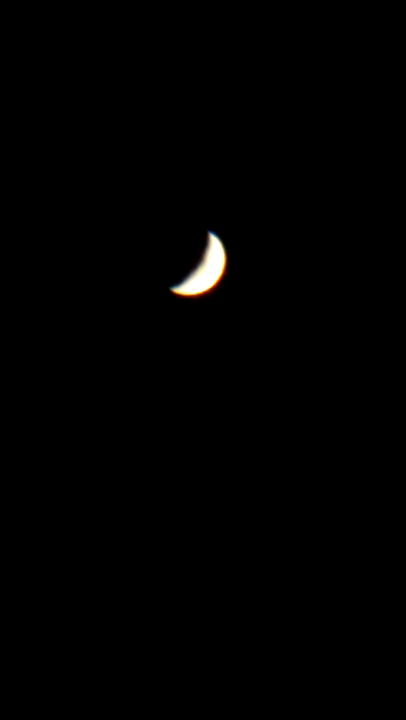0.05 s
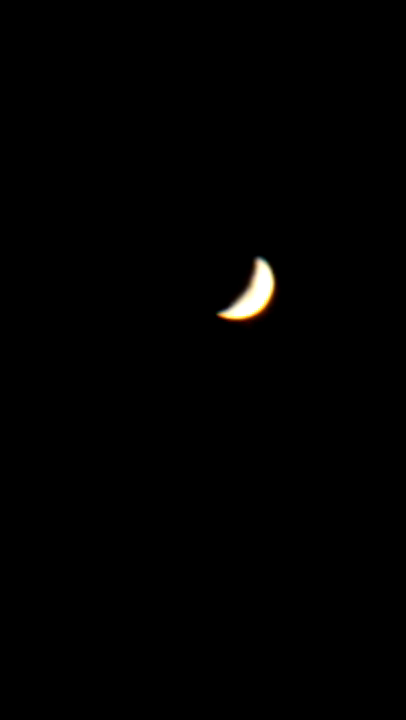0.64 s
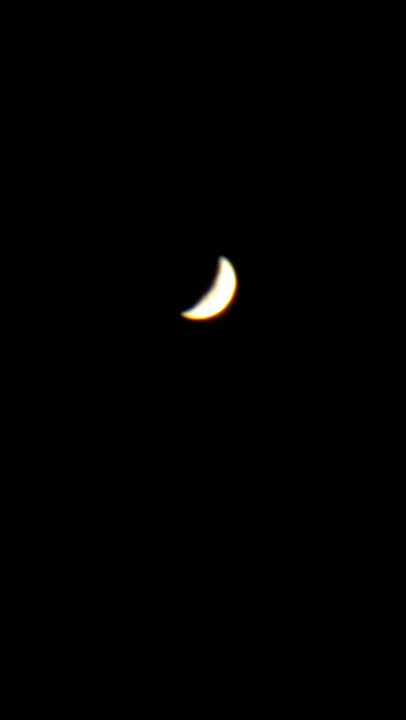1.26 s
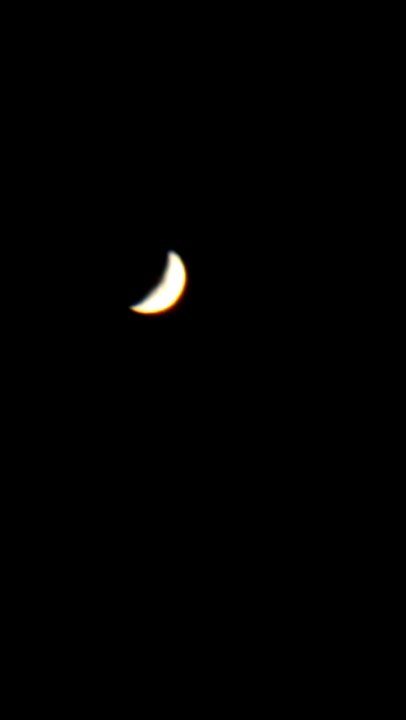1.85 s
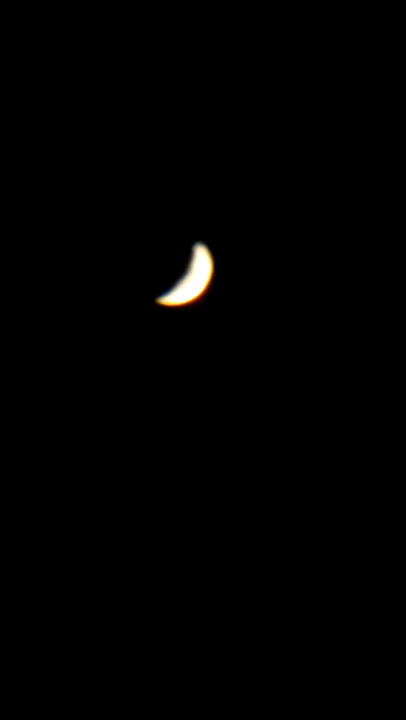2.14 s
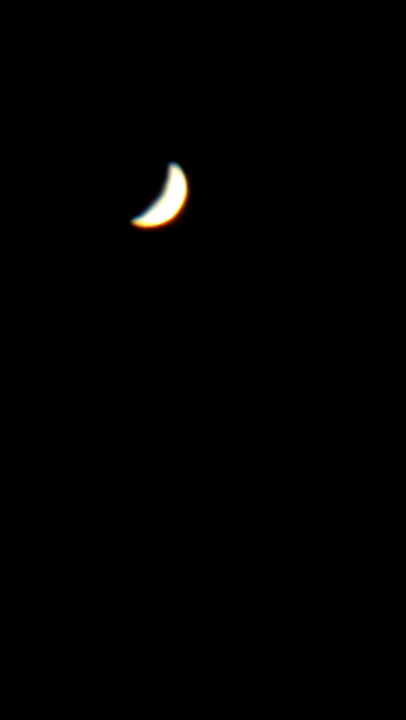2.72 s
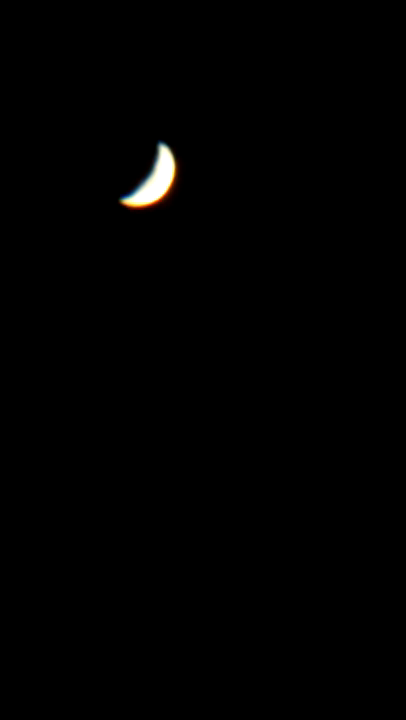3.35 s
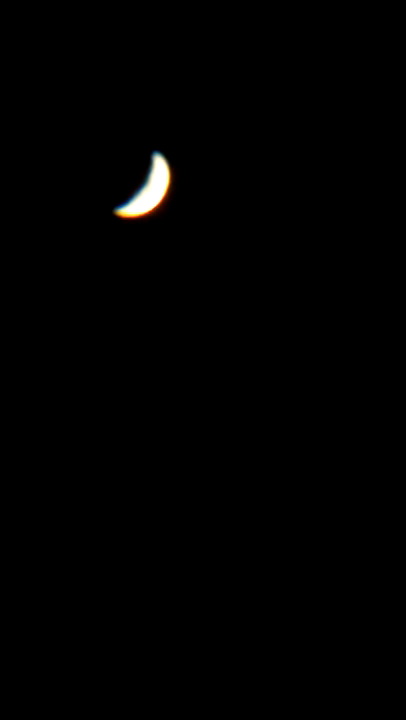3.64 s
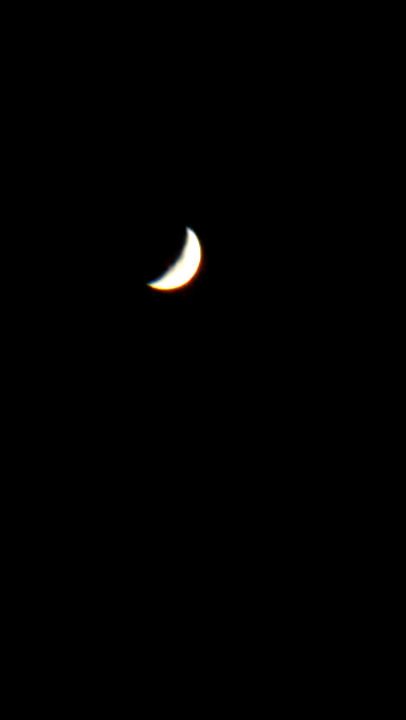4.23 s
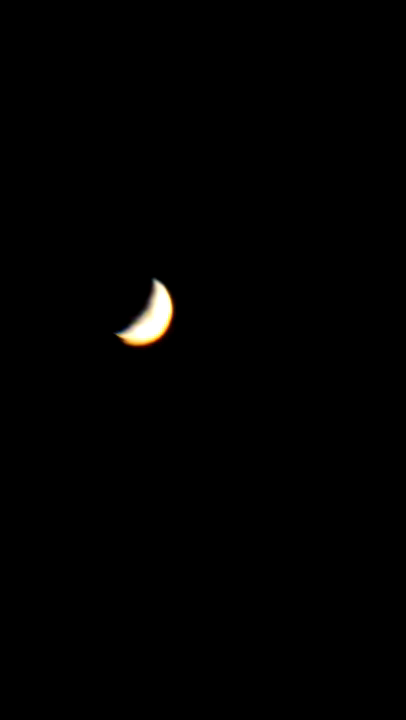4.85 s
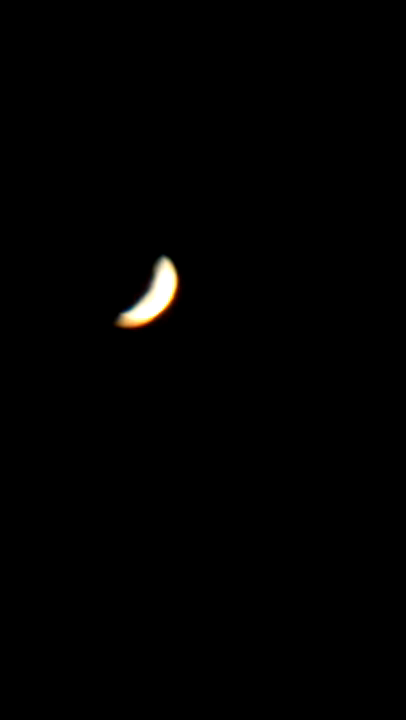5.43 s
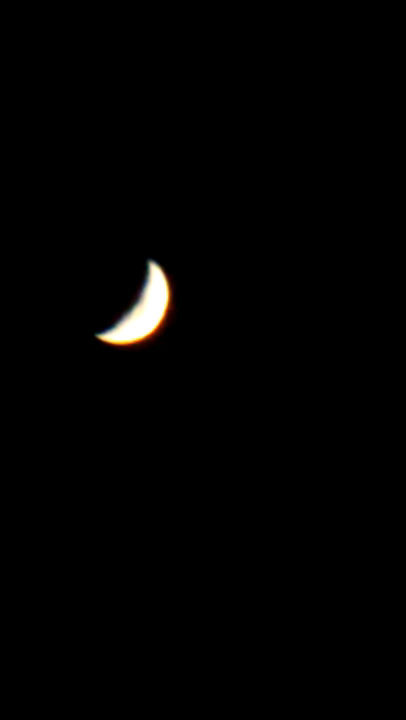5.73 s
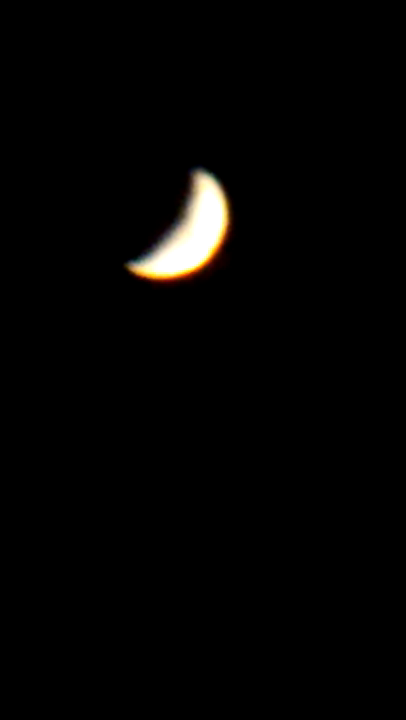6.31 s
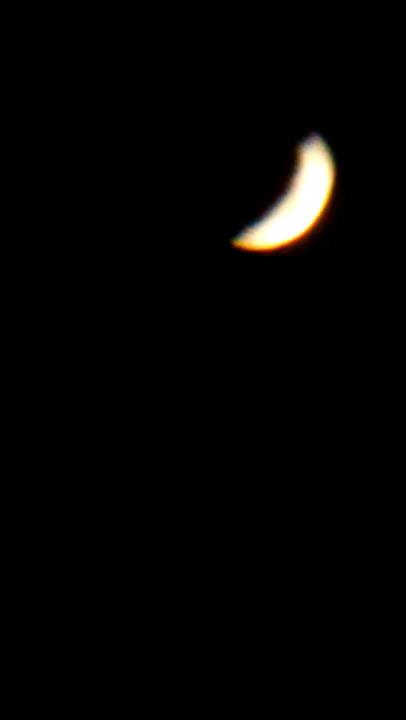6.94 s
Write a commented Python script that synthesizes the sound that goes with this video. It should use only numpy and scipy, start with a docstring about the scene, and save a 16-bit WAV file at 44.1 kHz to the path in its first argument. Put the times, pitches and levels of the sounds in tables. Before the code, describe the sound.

Outdoors by a road at night, a V8 car rolls close with a low, lumpy exhaust, sinking almost to idle between 1 and 2 seconds. Its tyres roar and hiss from about 0.5 seconds, with a few gritty flecks, and fade after 3 to 4 seconds. Around 3 seconds the throttle opens: the engine climbs with a brief growl into a deep, booming drone, loudest from 4 to 5.5 seconds and continuing to the end at 7. A katydid trills faintly from 2 to 4 seconds and again from 5 to 7, over a distant insect chorus. Thin, very high zips come intermittently between 2 and 6 seconds. Fingers click on the hand-held camera near 1.8 and 3.4 seconds, then rustle softly from 4.5. Small, distant knocks sound around 4.3 and 5.6 seconds. Far traffic rumbles throughout, with a very faint high ticking.

```python
"""Outdoors by a road at night: a V8 car rolls by, nearly idling, then opens the throttle and drones away.
Its uneven firings boom through the exhaust pipe; its tyres roar and hiss as it passes.
A katydid's wing strokes trill faintly in two bouts over a far chorus; thin, very high zips may be
another insect. Far traffic rumbles, with faint knocks and a high ticking, and now and then
fingers rustle and click on a hand-held camera."""
import sys
import numpy as np
from scipy import signal
from scipy.fft import rfft, irfft, next_fast_len
from scipy.io import wavfile
from scipy.ndimage import uniform_filter1d

SR = 44100
rng = np.random.default_rng(int(sys.argv[2]) if len(sys.argv) > 2 else 0)


def unload_audio(sound):
    """Save the sound as a 16-bit wav file, at the path given as the first command line argument."""
    columns = np.transpose(np.atleast_2d(sound))
    # keep every value between -1 and 1, then stretch to whole-number steps
    steps = np.round(np.clip(columns, -1, 1) * 32767)
    wavfile.write(sys.argv[1], SR, steps.astype(np.int16))


N = 311787
TIME = np.arange(N) / SR


# engine speed, eight firings a cycle: (time [s], cycle rate [Hz])
CYCLE_RATE = [(0, 10.8), (.55, 10.78), (1.05, 8.5), (1.7, 7.86), (2, 9.03), (2.8, 10.93), (3.1, 11.85),
              (3.35, 12.85), (3.65, 12.83), (4.84, 14.14), (5.7, 14.23), (7.07, 14.46)]
# (time [s], throttle opening [0-1])
THROTTLE_OPENING = [(0, 0.08), (.5, 0.22), (.8, 0.13), (2.3, 0.31), (2.9, 0), (3.3, 0.84), (3.8, 0.72),
                    (7.07, 1)]
# harmonics of the uneven firing: (order [x cycle rate], idle gain [dB], load gain [dB])
FIRING_ORDERS = [(4, -14, -16), (5, -9.5, 2), (6, -16.5, -10.5), (7, -7, -22), (8, -0.5, 1),
                 (9, -27, -19.5), (10, -13, -1), (11, 2.5, -21.5), (12, -28, -51.5), (13, -7.5, -4.5),
                 (14, -9.5, -18.5), (15, 4, -6.5), (16, -1.5, -8.5), (17, -31, -9.5), (18, -0.5, -15.5),
                 (19, -10, -23), (20, -8, -33.5), (21, -2, -26.5), (22, 0, -15.5), (24, -9.5, -2.5),
                 (27, 0.5, -23.5), (29, 8.5, -22.5)]
# exhaust pipe response: (frequency [Hz], gain [dB])
PIPE_RESPONSE = [(25, -39.5), (42, -26), (55, -21), (70, -19), (88, -12), (104, -1), (116, 1), (128, -7),
                 (145, -12), (165, -18), (245, -17.5), (280, -31.5), (400, -35.5), (900, -78)]
# (time [s], level before surges [dB])
EXHAUST_LEVEL = [(0, -25.5), (.4, -24), (.55, -30), (1.1, -30.5), (1.75, -37), (2.2, -29.5), (3, -28.5),
                 (3.9, -18), (4.25, -20.5), (4.85, -17.5), (5.36, -18), (5.47, -23.5), (5.87, -21),
                 (6.1, -23), (6.6, -26), (7.07, -20.5)]
# brief swells and dips: (time [s], change [dB], half-length [s])
EXHAUST_SURGES = [(0.627, 5, 0.022), (0.934, -10.5, 0.035), (2.718, 6, 0.1), (5.989, -14.5, 0.054),
                  (6.486, -12.5, 0.088)]

def engine(lope_db=3, firing_order=8):
    """A lumpy idle smooths into a drone as the firing rate climbs onto the pipe's boom."""
    (cycle_hz,) = curves(CYCLE_RATE)
    (throttle,) = curves(THROTTLE_OPENING)
    (level_db,) = curves(EXHAUST_LEVEL)
    cycle = np.cumsum(cycle_hz) / SR - .58
    # combustion varies more off the throttle
    unsteady = .82 * (1 - throttle) + .75 * throttle
    firings = np.zeros(N)
    for order, idle_db, load_db in FIRING_ORDERS:
        strength = undb(idle_db + throttle * (load_db - idle_db))
        # strong, low orders are steadiest
        waver = unsteady * np.clip(1 - 1.6 * strength * throttle, 0, 1) * (order / 11) ** 1.3
        # low orders beat together once a cycle; reflections jumble the high ones
        phase_turns = .012 * (order - 11) ** 2 + rng.random() * (order > 15)
        # the other orders oppose the firing tone: one weak firing a cycle
        sign = -1 if order == firing_order else 1
        tone = sign * np.exp(2j * np.pi * (order * cycle + phase_turns))
        flutter = (1 + waver * (walk(9) + 1j * walk(8))) / np.sqrt(1 + 2 * waver ** 2)
        firings += strength * np.real(tone * flutter)
    gas = undb(14.5 - 4.3 * throttle) * rng.standard_normal(N)
    lope = undb(lope_db * (1 - throttle) * np.abs(np.cos(np.pi * cycle)) ** 10)
    pipe = colour(firings + gas, PIPE_RESPONSE) * lope
    surge_db = sum(db * np.exp(-((TIME - s) / half_s) ** 2) for s, db, half_s in EXHAUST_SURGES)
    running_rms = np.sqrt(uniform_filter1d(pipe ** 2, SR // 5))
    return pipe / running_rms * undb(level_db + surge_db)


def growl(start_s=2.75, end_s=3.9, level_db=-36):
    """An upper exhaust resonance sounds while the car picks up speed."""
    return undb(level_db) * swell(start_s, end_s) * resonance(hz=249.4, width_hz=38)


# (time [s], level [dB])
DRONE_ENVELOPE = [(0, -38.5), (.8, -45.5), (1.2, -41), (2.3, -35), (3.25, -37.5), (4.1, -48), (4.4, -49.5),
                  (4.65, -50), (4.9, -46), (5.25, -49), (5.55, -55.5), (5.8, -49.5), (6.22, -50.5),
                  (6.45, -54.5), (7.07, -53)]
# (frequency [Hz], gain [dB])
DRONE_SPECTRUM = [(130, -12), (220, 3), (290, -2.5), (450, -2), (600, -7), (800, -29.5), (1200, -64)]

def road_drone():
    """The low, wavering part of the road noise."""
    (level_db,) = curves(DRONE_ENVELOPE)
    return noise(DRONE_SPECTRUM) * undb(level_db + walk(14))


# low, middle and high tyre bands: (frequency [Hz], gain [dB])
ROAR_SPECTRUM = [(350, -34.5), (620, 1), (850, 2), (1050, 1.5), (1330, 2.5), (1550, -0.5), (1750, -2),
                 (2000, -33), (3000, -59.5)]
RING_SPECTRUM = [(1500, -21.5), (1750, -3), (1900, 1.5), (2060, -1.5), (2200, -9.5), (2400, -18),
                 (3000, -53.5)]
RUSH_SPECTRUM = [(1800, -37.5), (2350, 0), (2700, 7.5), (3300, 3.5), (3650, 0.5), (4200, -3), (5000, -27),
                 (6500, -27), (9000, -54.5)]
# per band: (hold start [s], hold end [s], level [dB], rise [dB/s], fall [dB/s], floor [dB])
PASS_BY = {"roar": (0.7, 3.0, -37.5, 0.5, 12, -53.5), "ring": (1.27, 4, -47.5, 10, 11.5, -59),
           "rush": (1.3, 3, -55, 0, 6, -68)}

def tyre_roar(flicker_db=.7, reflection_gain=.23, delay_s=.0018, near_s=2.4, near_half_s=.96):
    """Tyre roar swells and fades; while the car is far off, a road reflection makes it sound hollow."""
    roar = noise(ROAR_SPECTRUM) * passing(*PASS_BY["roar"]) * undb(flicker_db * walk(40))
    ring = noise(RING_SPECTRUM) * passing(*PASS_BY["ring"]) * undb(2 * flicker_db * walk(40))
    rush = noise(RUSH_SPECTRUM) * passing(*PASS_BY["rush"]) * undb(flicker_db * walk(40))
    direct = swirl(roar + ring + rush)
    reflected = np.interp(TIME - delay_s, TIME, direct)
    mix = reflection_gain * (1 - np.exp(-((TIME - near_s) / near_half_s) ** 2))
    return (direct - mix * reflected) / np.sqrt(1 + mix ** 2)


# (time [s], spray level [dB], sizzle level [dB])
TREBLE_LEVELS = [(0, -64.5, -56.5), (.48, -64.5, -51.5), (.7, -61, -51.5), (1.1, -59, -47),
                 (1.65, -58, -43), (2.1, -58.5, -46), (2.6, -58, -52), (4.22, -61, -54), (4.48, -69, -62),
                 (4.92, -81, -67.5), (6.3, -86.5, -74), (7.07, -83, -75)]
# (frequency [Hz], gain [dB])
SPRAY_SPECTRUM = [(3500, -33), (4800, 2), (6100, 3), (7000, 1.5), (8500, 0.5), (10000, -19), (12000, -18.5),
                  (16000, -16)]
SIZZLE_SPECTRUM = [(7000, -32), (9500, -11.5), (10600, -6.5), (11300, -0.5), (11800, -1), (12500, -2),
                   (13100, -11.5), (14000, -11), (15700, -22)]

def tyre_treble(flicker_db=.86):
    """Two broad bands of tyre hiss flicker together and fade as the car leaves."""
    spray_db, sizzle_db = curves(TREBLE_LEVELS)
    spray = noise(SPRAY_SPECTRUM) * undb(spray_db)
    sizzle = noise(SIZZLE_SPECTRUM) * undb(sizzle_db)
    return (spray + sizzle) * undb(flicker_db * walk(25))


# (frequency [Hz], width [Hz], level [dB], start [s], end [s])
HISS_BANDS = [(1293, 200, -41, 0.74, 1.45), (2020, 250, -48, 1, 1.9), (2900, 690, -47.5, 0.66, 2.07),
              (3470, 630, -50, 0.645, 1.7), (7330, 600, -62, 0.5, 1.2), (9600, 560, -60.5, 0.54, 1.7),
              (11240, 650, -48.5, 0.57, 1.5), (11830, 700, -43.5, 0.52, 1.67), (12700, 500, -53, .55, 1.6),
              (2950, 550, -58.5, 2, 3.44), (3180, 200, -55.5, 2.84, 3.02), (878, 65, -52, 3.4, 4.17),
              (1350, 190, -48.5, 3, 4.21), (2820, 110, -66, 2.8, 4.4)]

def passing_hiss(grain_db=1.27):
    """The car's grainy hiss rings in bands that come and go; one softer band swells twice."""
    first_swell = passing(start_s=1.44, end_s=1.54, level_db=-54,
                          rise_db_per_s=42, fall_db_per_s=38, floor_db=-90.5)
    second_swell = undb(-57) * swell(1.85, 2.26)
    soft = resonance(hz=6010, width_hz=700) * (first_swell + second_swell)
    sharp = sum(undb(db) * resonance(hz, width_hz) * swell(start_s, end_s)
                for hz, width_hz, db, start_s, end_s in HISS_BANDS)
    return sharp * undb(grain_db * walk(120)) + soft


# (time [s], level [dB], fade [s])
GRIT_GRAINS = [(0.902, -37, .005), (1.151, -32, 0.004), (1.335, -40, 0.0062), (1.57, -39, 0.008)]

def grit():
    """Stray grains under the tyres flare in the hiss while the car is near."""
    flares = np.zeros(N)
    t = TIME[:SR // 20]
    for s, db, fade_s in GRIT_GRAINS:
        add(flares, s, undb(db) * t / fade_s * np.exp(1 - t / fade_s))
    return flares * resonance(hz=11800, width_hz=700)


# (start [s], end [s], level [dB], fade-in [s])
KATYDID_BOUTS = [(1.95, 3.98, -52, .22), (4.86, 7.02, -52, 0.27)]

def katydid(pitch_hz=5190, fall_hz=470, flat_hz=220, warm_up_s=.3,
            stroke_s=.011, period_s=.0158, rest_s=.0145, spread_db=1.5, rasp_db=2):
    """Wing strokes in groups of two to four; each is a short, raspy tone that slides down."""
    trill = np.zeros(N)
    progress = TIME[:int(stroke_s * SR)] / stroke_s
    envelope = np.sin(np.pi * progress) ** 2
    slide_hz = fall_hz * (.5 - progress)
    for start_s, end_s, level_db, fade_in_s in KATYDID_BOUTS:
        s = start_s
        while s + 2 * period_s <= end_s:
            strokes = np.clip(round(rng.normal(3.1, .7)), 2, 4)
            group_db = rng.normal(level_db, .5)
            for _ in range(strokes):
                # each bout starts flat and rises to pitch
                centre_hz = pitch_hz - flat_hz * np.exp((start_s - s) / warm_up_s) + rng.normal(0, 40)
                fade_in = 1 - np.exp((start_s - s) / fade_in_s)
                gain = undb(rng.normal(group_db, spread_db)) * fade_in
                add(trill, s, gain * envelope * sine(centre_hz + slide_hz))
                s += period_s
            s += rest_s * rng.lognormal(0, .3)
    return scatter(trill * undb(rasp_db * walk(700)), t60_s=.29, wet_db=-6)


# (time [s], relative peak [dB], pitch [Hz])
ZIP_EVENTS = [(2.225, -27.5, 12800), (2.2826, -31.5, 12500), (2.3414, -26.5, 12440), (2.5207, -38, 12800),
              (2.583, -38, 12800), (2.7641, -39, 12900), (2.832, -40, 12800), (2.9846, -32, 12400),
              (3.056, -30, 12400), (3.3797, -44, 12700), (3.4276, -36, 12800), (3.484, -39, 12800),
              (3.8886, -46, 12700), (4.5256, -46, 12600), (4.5875, -37, 12700), (4.6498, -40, 12300),
              (4.7077, -43, 12530), (4.9926, -42, 12400), (5.0674, -46, 12500), (5.223, -54, 12400),
              (5.2904, -55.5, 12400), (5.782, -45, 12300)]

def zips(rise_s=.0044, jitter_hz=150, gain_db=-2):
    """Each zip is a quick, rough scrape of something tiny and sharply tuned."""
    scrapes = np.zeros(N)
    t = TIME[:SR // 10]
    envelope = (t / rise_s * np.exp(1 - t / rise_s)) ** 2
    for s, db, hz in ZIP_EVENTS:
        rasp = unit(uniform_filter1d(rng.standard_normal(len(t)), size=40))
        add(scrapes, s, undb(db) * envelope * sine(hz + jitter_hz * rasp))
    return undb(gain_db) * scatter(scrapes, t60_s=.25, wet_db=-6)


# (time [s], envelope gain [dB], fade [s])
FINGER_RUBS = [(1.818, -37, 0.019), (4.52, -52, 0.22), (4.586, -49, 0.02), (4.633, -54, .015),
               (4.698, -50, .008), (4.748, -52, 0.047), (4.985, -55, 0.035), (5.055, -52.5, 0.041),
               (5.185, -57.5, 0.083), (5.53, -59, 0.11), (5.775, -56, 0.08), (5.966, -50.5, 0.038),
               (6.04, -53, 0.029), (6.1, -53, .06), (6.63, -54, 0.035), (6.9, -64, 0.18)]
BODY_CLICKS = [(1.8158, -23, 0.0028), (1.8215, -30, .003), (3.415, -30, 0.0012), (4.583, -47, .008),
               (4.7425, -44, 0.0065), (6.032, -49, .008), (6.627, -54, .008)]
# (frequency [Hz], gain [dB])
RUB_SPECTRUM = [(2000, -32), (4000, -16.5), (6000, -0.5), (8000, -9.5), (10000, -3), (12000, 8.5),
                (13500, -4), (15700, -10.5)]
CLICK_SPECTRUM = [(2000, -27), (4000, -16), (6000, -6), (8000, -8), (9500, 5), (12000, 9.5), (13500, -2),
                  (15700, -10)]

def handling(click_attack_s=.00057, grain_db=2):
    """Fingers make brief, grainy rubs and crisp clicks on the camera body."""
    rubs, clicks = np.zeros(N), np.zeros(N)
    t = TIME[:SR // 4]
    for s, db, fade_s in FINGER_RUBS:
        add(rubs, s, undb(db) * burst(t, fade_s / 3.5, fade_s))
    for s, db, fade_s in BODY_CLICKS:
        add(clicks, s, undb(db) * burst(t, click_attack_s, fade_s))
    rustle = rubs * noise(RUB_SPECTRUM) * undb(grain_db * walk(300))
    return rustle + clicks * noise(CLICK_SPECTRUM)


# (time [s], envelope gain [dB])
KNOCK_BLOWS = [(4.225, -33.5), (4.386, -30.5), (4.42, -40), (5.586, -42)]

def knocks(attack_s=.0025, fade_s=.008):
    """Small, hollow, far knocks ring roughly in two damped modes."""
    blows = np.zeros(N)
    for s, db in KNOCK_BLOWS:
        add(blows, s, undb(db) * burst(TIME[:SR // 10], attack_s, fade_s))
    modes = resonance(hz=1460, width_hz=180) + undb(-6) * resonance(hz=2000, width_hz=180)
    return blows * modes


def far_traffic(level_db=-45):
    """A low, slowly heaving rumble of far traffic."""
    rumble = noise([(25, -15), (42, -22.5), (65, -7.5), (100, -5.5),
                    (200, -3.5), (350, -22.5), (700, -58.5)])
    return rumble * undb(level_db + walk(3.2))


# (frequency [Hz], width [Hz], level [dB])
FAR_ROAD_MODES = [(832, 246, -54.5), (1420, 300, -59), (2094, 110, -65.5), (2594, 260, -68.5),
                  (3290, 170, -70)]

def far_road(full_s=5.6, rise_db_per_s=7):
    """A hollow, wavering wash of far tyres comes up and stays."""
    wash = sum(undb(db) * resonance(hz, width_hz) for hz, width_hz, db in FAR_ROAD_MODES)
    return swirl(wash) * undb(-rise_db_per_s * np.maximum(full_s - TIME, 0))


# (time [s], level [dB])
CHORUS_LEVEL = [(0, -64.5), (1, -57.5), (2.5, -68.5), (4.5, -65.5), (5.3, -66), (6, -63), (7.07, -74)]

def chorus(flutter_db=1.7):
    """Many far trills blur into one fluttering band."""
    (level_db,) = curves(CHORUS_LEVEL)
    band = noise([(4100, -18.5), (4550, -7.5), (4800, -2), (5100, -8), (5450, -9), (6000, -18)])
    return band * undb(level_db + flutter_db * walk(60))


def ticking(rate_hz=17.086, first_s=.0085, fade_s=.0025, level_db=-56):
    """A faint, even ticking at the top of the treble."""
    age_s = (TIME - first_s) % (1 / rate_hz)
    band = noise([(11000, -25), (13000, -1), (14500, -3.5), (15700, -2)])
    return np.exp(-age_s / fade_s) * band * undb(level_db + 1.5 * walk(10))


def swirl(x, depth_db=2.3, frame_samples=1024):
    """Moving air makes neighbouring bands swell and fade in brief patches."""
    cells = signal.stft(x, nperseg=frame_samples)[2]
    patches = rng.standard_normal(cells.shape)
    for axis in (0, 1, 0, 1):
        patches = uniform_filter1d(patches, size=4, axis=axis)
    return signal.istft(cells * undb(depth_db * unit(patches)), nperseg=frame_samples)[1][:N]


def scatter(x, t60_s, wet_db):
    """Direct sound plus a short diffuse tail from leaves and walls."""
    t = TIME[:SR // 2]
    tail = rng.standard_normal(len(t)) * undb(-60 * t / t60_s)
    return x + undb(wet_db) * signal.fftconvolve(x, tail / np.linalg.norm(tail))[:N]


def passing(start_s, end_s, level_db, rise_db_per_s, fall_db_per_s, floor_db):
    """Gain that rises, holds from start to end, then falls to a floor."""
    approach_db = rise_db_per_s * np.maximum(start_s - TIME, 0)
    retreat_db = fall_db_per_s * np.maximum(TIME - end_s, 0)
    return np.hypot(undb(level_db - approach_db - retreat_db), undb(floor_db))


def swell(start_s, end_s):
    """Rounded arch from 0 to 1 and back."""
    progress = np.clip((TIME - start_s) / (end_s - start_s), 0, 1)
    return np.sqrt(4 * progress * (1 - progress))


def burst(t, attack_s, fade_s):
    """Exponential attack and decay."""
    return np.exp(-t / fade_s) * (1 - np.exp(-t / attack_s))


def sine(hz):
    """Sine following a frequency curve."""
    return np.sin(2 * np.pi * np.cumsum(hz) / SR)


def resonance(hz, width_hz):
    """Band-passed noise, rms 1."""
    band = signal.butter(2, [hz - width_hz / 2, hz + width_hz / 2], "bandpass", fs=SR, output="sos")
    return unit(signal.sosfilt(band, rng.standard_normal(N)))


def noise(spectrum):
    """Noise coloured by (frequency [Hz], gain [dB]) points, rms 1."""
    return unit(colour(rng.standard_normal(N), spectrum))


def colour(x, spectrum):
    """Filter by (frequency [Hz], gain [dB]) points; 12 dB/octave skirts."""
    size = next_fast_len(N + 8192)
    hz, db = np.transpose(spectrum)
    bins_hz = np.maximum(np.fft.rfftfreq(size, 1 / SR), 1)
    gain = undb(np.interp(np.log(bins_hz), np.log(hz), db))
    skirts = np.minimum(bins_hz / hz[0], 1) ** 2 * np.minimum(hz[-1] / bins_hz, 1) ** 2
    return irfft(rfft(x, size) * gain * skirts, size)[:N]


def walk(rate_hz):
    """Smooth random wander, rms 1."""
    hold = max(int(SR / rate_hz), 2)
    steps = np.repeat(rng.standard_normal(N // hold + 1), hold)
    return unit(uniform_filter1d(steps, hold)[:N])


def curves(table):
    """Each value column, interpolated linearly in time."""
    times_s, *columns = np.transpose(table)
    return [np.interp(TIME, times_s, column) for column in columns]


def add(track, at_s, sound):
    """Mix a sound into a track."""
    start = int(np.clip(at_s * SR, 0, N))
    track[start:start + len(sound)] += sound[:N - start]


def unit(x):
    """Scale to rms 1."""
    return x / np.sqrt(np.mean(x ** 2))


def undb(db):
    """Decibels to gain."""
    return 10 ** (np.asarray(db) / 20)


def scene():
    """Car, insects, handling and background, in mono."""
    car = engine() + growl() + road_drone() + tyre_roar() + tyre_treble() + passing_hiss() + grit()
    details = katydid() + zips() + handling() + knocks()
    background = far_traffic() + far_road() + chorus() + ticking()
    return (car + details + background)[None]


def record(dry, hiss_db=-69, cutoff_hz=15800):
    """The camera adds a faint high hiss and cuts the very top."""
    hiss = noise([(5000, -12), (9000, -19), (12000, 3), (13500, -3.5), (15700, -1)])
    hiss *= undb(hiss_db + 1.6 * walk(33))
    lowpass = signal.ellip(10, .2, 80, cutoff_hz, fs=SR, output="sos")
    return signal.sosfilt(lowpass, dry + hiss)


dry = scene()
out = record(dry)
unload_audio(out)
```